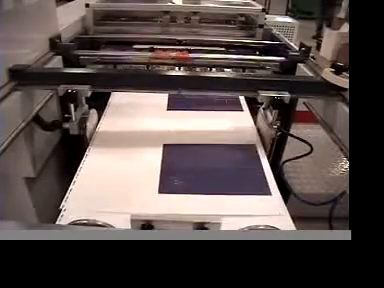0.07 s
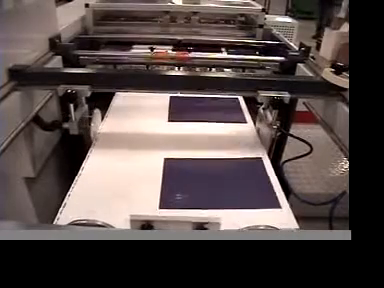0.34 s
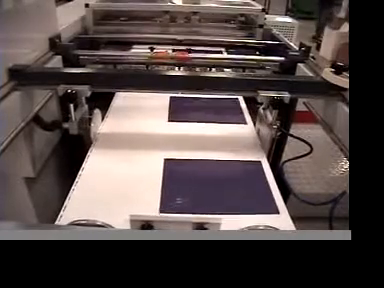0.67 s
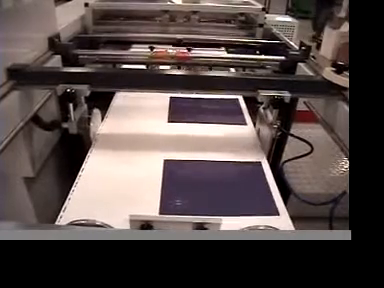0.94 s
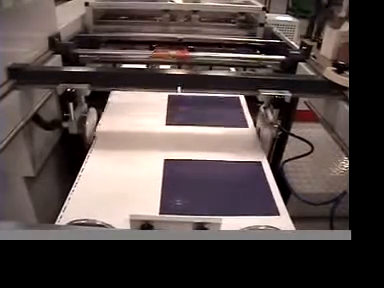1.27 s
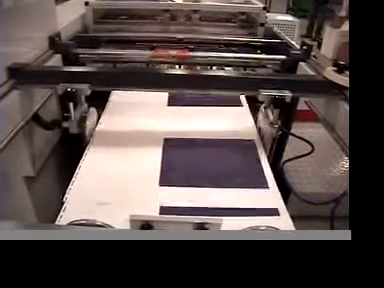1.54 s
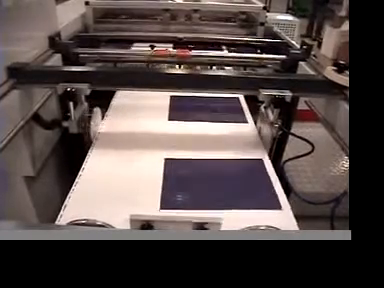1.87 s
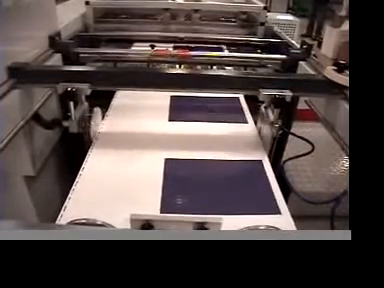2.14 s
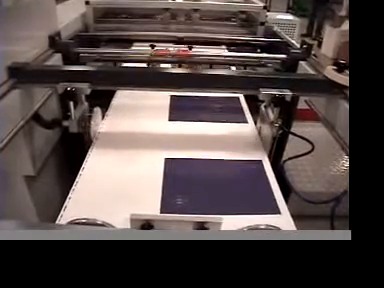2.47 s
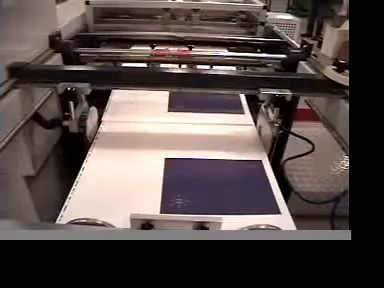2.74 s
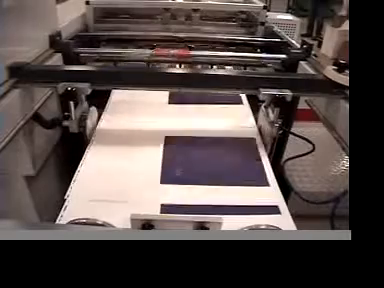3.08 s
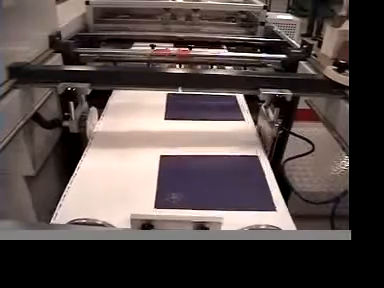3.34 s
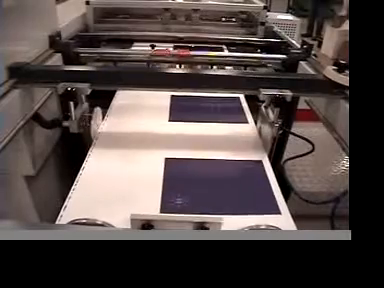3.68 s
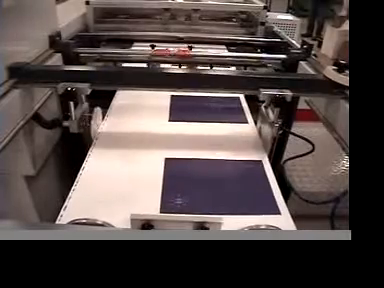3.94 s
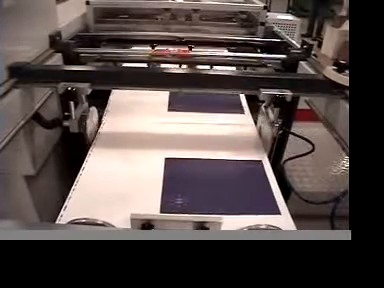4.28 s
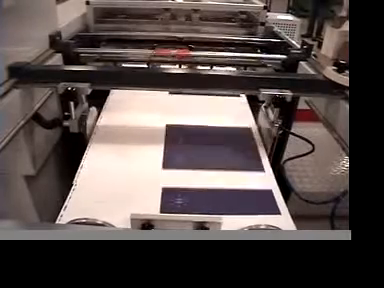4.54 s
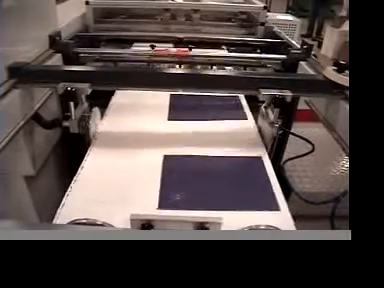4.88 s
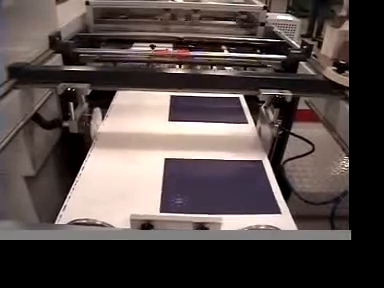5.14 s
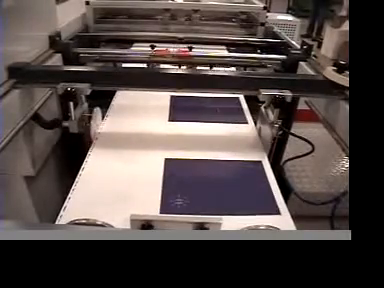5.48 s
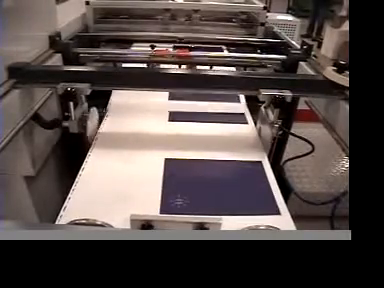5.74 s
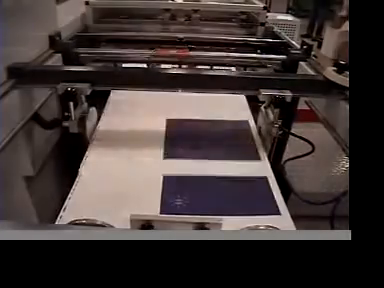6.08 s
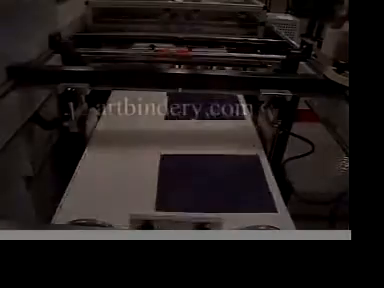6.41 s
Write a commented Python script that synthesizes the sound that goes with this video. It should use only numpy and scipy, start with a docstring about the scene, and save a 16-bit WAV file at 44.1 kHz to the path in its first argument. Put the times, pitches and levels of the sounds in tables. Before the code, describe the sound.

A steady roller rumble, fine rattle and motor hum come from a nearby workshop laminator. Over this its sheet feeder repeats a pattern four times: it knocks and ticks, lands with a clatter a little to the left, blows a bright hiss of air and clacks shut. Paper scrapes faintly near the end of each hiss. Then everything suddenly stops.

```python
"""Laminating machine in a workshop

The machine takes a sheet about every 1.54 s. Its rollers rumble and rattle while a vacuum pump hums.
A turning camshaft times the belt, a knocking stop and a ticking latch. The feeder keeps its own time:
it clatters, blows air under the next sheet and clacks shut. A fast automatic volume control turns
the sound down briefly after loud blows. Near the end everything cuts to silence."""
import sys
import numpy as np
from scipy import signal
from scipy.fft import rfft, irfft
from scipy.io import wavfile

SR = 44100
rng = np.random.default_rng(int(sys.argv[2]) if len(sys.argv) > 2 else 0)


def generate_wav(signal):
    """Clip the signal to [-1, 1] and save it as 16-bit WAV at the path in sys.argv[1]."""
    frames = np.transpose(np.atleast_2d(signal))
    scaled = np.clip(frames, -1, 1) * 32767
    pcm = np.round(scaled).astype(np.int16)
    wavfile.write(sys.argv[1], SR, pcm)


N = 287973
TIME = np.arange(N) / SR
FREQS = np.maximum(np.fft.rfftfreq(N, 1 / SR), 1)
TURN_S, END_S = 1.5395, 5.862  # one turn of the camshaft; when the sound cuts off
DIRECT_ONLY = np.array([[1], [0]])  # each source has two rows: direct sound and scattered sound

# The air-driven feeder head lands on a sheet: t/s, level/dB, time between bounces/s
HEAD_LANDINGS = [(.296, -1, 0.014), (1.866, 0, 0.012), (3.442, -1.5, .0145), (4.941, 0, .012)]
# The valve lever shuts: t/s, level/dB
LEVER_CLACKS = [(1.188, -5.5), (2.762, -5), (4.263, -6), (5.837, -4.5)]


def rollers(rumble_db, rattle_db, clicks_per_s, click_db, throb_db, flutter_db):
    """Rollers rumble unevenly; chains and bearings add a dense rattle of tiny clicks."""
    # How strong the rumble and the rattle are from low to high pitch: f/Hz, level/dB
    rumble_spectrum = [(15, -37.5), (30, -28), (42, -14), (52, -16.5), (62, -13), (80, -0.5), (170, 0.5),
                       (300, -0.5), (480, -3), (700, -2.5), (1000, -7), (1500, -14), (3000, -16),
                       (16000, -58.5)]
    rattle_spectrum = [(300, -8), (800, -0.5), (1250, 0.5), (1500, -3), (2300, -2.5), (3100, -6),
                       (4000, -11), (4800, -18.5), (6500, -17.5), (9500, -21.5), (12500, -34),
                       (16000, -41.5)]
    rumble = coloured(white(), rumble_spectrum) * from_db(rumble_db + throb_db * drift(40))
    clicks = rms_one((rng.random(N) < clicks_per_s / SR) * np.sign(white()))
    rattle = coloured(white() + from_db(click_db) * clicks, rattle_spectrum)
    return rumble + rattle * from_db(rattle_db + flutter_db * drift(60))


def transport():
    """The belt runs and jolts the frame; the next sheet is braked and rubs over the table."""
    belt = stroke(-.32, .49, rings=[(177, 50, -29.5), (2240, 500, -30)])
    jolt = stroke(-.03, .09, rings=[(90, 30, -27), (298, 123, -17.5), (540, 49, -28.5)])
    brake = stroke(.909, .125, rings=[(213, 25, -21.5), (577, 131, -22), (1256, 49, -30)])
    rub = stroke(1.055, .17, rings=[(550, 25, -23.5), (683, 60, -23), (970, 200, -24.5)])
    return belt + jolt + brake + rub


def sheet_stop():
    """The sheet stop knocks once a turn and bounces straight back."""
    # The stop's ringing tones: f/Hz, level/dB, time to fade by 60 dB/s
    tones = [(615, -15, .05), (896, -7.5, 0.12), (1280, -2, .04), (1386, -2.5, 0.052), (1970, -11, .03),
             (3000, -20, .03), (8550, -27.5, .04)]
    blows = bouncing(each_turn(.0515, db=-1), gap_s=.003, loss_db=7.5, count=2)
    return strike(blows, tones, contact_s=.00088, tail_db=-5.5, tail_s=.045, spread_db=1.5)


def feeder_head():
    """The head lifts with a light touch, then lands on the sheet and clatters."""
    # The head's ringing tones: f/Hz, level/dB, time to fade by 60 dB/s
    tones = [(966, -10.5, .06), (1036, -9, .08), (1235, -5, 0.04), (1420, -7.5, 0.046), (1694, -9.5, 0.054),
             (2003, -8.5, 0.056), (2410, -10, 0.04), (3095, -13, 0.035), (4050, -15.5, 0.036),
             (8510, -27.5, 0.043)]
    blows = each_turn(.286, db=-8.5)  # the lifts
    for lands, db, gap_s in HEAD_LANDINGS:
        blows += bouncing([(lands, db)], gap_s, loss_db=1.9, count=4)
    return strike(blows, tones, contact_s=.002, tail_db=-8, tail_s=.08, spread_db=2.5)


def valve_lever():
    """The valve lever clacks shut at the end of each blast of air."""
    # The lever's ringing tones: f/Hz, level/dB, time to fade by 60 dB/s
    tones = [(1207, -3.5, 0.046), (1453, -4, 0.037), (1580, -4.5, 0.04), (1890, -4.5, 0.055),
             (2354, -9, 0.056), (3320, -4.5, .06), (3720, -10.5, 0.087), (5500, -11.5, .04),
             (6350, -15, 0.074), (7550, -14.5, 0.045), (9000, -16, 0.05), (11100, -20, .07)]
    return strike(LEVER_CLACKS, tones, contact_s=.003, tail_db=-4, tail_s=.11, spread_db=2)


def latch():
    """The latch ticks shut with one bounce, and slides open more softly."""
    # The latch's ringing tones: f/Hz, level/dB, time to fade by 60 dB/s
    tones = [(2183, -4, 0.037), (4360, -8.5, 0.019), (5390, -8.5, 0.02), (6540, -10, 0.022),
             (7130, -6, .025), (8730, -5, 0.018), (9700, -10, 0.03), (12000, -17.5, .03)]
    shuts = bouncing(each_turn(.1965, db=-12), gap_s=.0081, loss_db=6, count=2)
    opens = each_turn(.273, db=-19)
    ticks = strike(shuts, tones, contact_s=.0005, tail_db=-1, tail_s=.044, spread_db=2)
    slides = strike(opens, tones, contact_s=.007, tail_db=0, tail_s=.09, spread_db=2.5)
    return ticks + slides


def air_blast(level_db, rise_s, fall_s, flutter_db):
    """Nozzles hiss as pressure builds when the valve opens and leaks away when it closes."""
    # The tone colour of the hiss: f/Hz, level/dB
    hiss_spectrum = [(1000, -34), (3000, 0), (4200, -1.5), (5000, -1.5), (5600, -7), (7500, -2),
                     (9100, 1.5), (10200, -3), (11500, -7), (13000, -16.5), (16000, -20.5)]
    flow = 0
    for (lands, _, _), (shuts, _) in zip(HEAD_LANDINGS, LEVER_CLACKS):
        on, off = lands + .017, shuts - .073  # just after the landing, just before the clack
        flow += np.clip((TIME - on) / rise_s, 0, 1) * np.clip(1 - (TIME - off) / fall_s, 0, 1)
    return flow * from_db(level_db + flutter_db * drift(23)) * coloured(white(), hiss_spectrum)


def paper_scrape():
    """Paper scrapes along the guides, falling in pitch as it slows."""
    # Noise bands of one scrape: delay/s, length/s, f/Hz, width/Hz, level/dB
    bands = [(.003, .012, 4900, 500, -4), (.004, .02, 3950, 500, -3), (.008, .026, 3300, 600, 0),
             (.006, .02, 2500, 500, -1), (0, .05, 8500, 2500, -12)]
    slides = each_turn(1.019, db=-21)
    scrape = 0
    for delay, length, hz, width, band_db in bands:
        loudness = sum(from_db(db + band_db) * swell(start + delay, length) for start, db in slides)
        scrape += loudness * resonant(hz, width)
    return scrape


def sucker_squeaks(waver_hz):
    """Air whistles past the lip of a suction cup."""
    # The squeaks: t/s, length/s, f/Hz, level/dB
    squeaks = [(3.482, 0.069, 6350, -19.5), (3.487, 0.039, 9300, -20), (4.953, .022, 6330, -26),
               (5.007, 0.017, 6300, -21.5)]
    whistle = 0
    for start, length, hz, db in squeaks:
        whistle += from_db(db) * swell(start, length) * sine(hz + waver_hz * drift(300))
    return whistle * DIRECT_ONLY


def pump(waver_db, wander_hz):
    """The pump and motor hum with slightly wavering tones and keep the housing droning."""
    # Tones of the pump and motor: f/Hz, level/dB
    tones = [(81, -42.5), (160, -37), (181, -43), (244, -32), (462.5, -28), (731, -35.5), (1070, -39.5),
             (1619, -37.5), (4419, -55), (5700, -49.5), (5834, -53), (5877, -54), (6122, -50.5),
             (6163, -56), (6500, -57), (6744, -50.5)]
    # Where the housing rings: f/Hz, width/Hz, level/dB
    housing_rings = [(104.7, 11, -33), (384.2, 15, -27.5), (735, 22, -35), (1932, 50, -33.5),
                     (6352, 22, -48.5)]
    hum = 0
    for hz, db in tones:
        tone = np.sqrt(2) * sine(hz + wander_hz * drift(8.6))
        hum += tone * from_db(db + waver_db * drift(8.4))
    return hum * DIRECT_ONLY + drone(housing_rings)


def strike(blows, tones, contact_s, tail_db, tail_s, spread_db):
    """Each blow builds up and makes a part ring; the frame scatters a noisy tail of the same colour."""
    out, t = np.zeros((2, N + SR)), TIME[:SR // 4]
    lowest, highest = tones[0][0], tones[-1][0]
    outline = [(hz, db - 10 * np.log10(hz / lowest)) for hz, db, _ in tones]
    noise = coloured(white(), [(lowest / 2, -30), *outline, (highest * 2, -55)])
    hz, level_db, fade_s = np.transpose(tones)[:, :, None]
    build_up = np.minimum(t / contact_s, 1)
    tail = from_db(tail_db - 60 * t / tail_s)
    for start, db in blows:
        at = int(start * SR)
        span = slice(at, at + len(t))
        strength = from_db(level_db + spread_db * rng.standard_normal(hz.shape))
        phase = 2 * np.pi * (hz * t + rng.random(hz.shape))
        ring = np.sum(strength * np.sin(phase) * from_db(-60 * t / fade_s), axis=0)
        out[:, span] += from_db(db) * build_up * (ring * DIRECT_ONLY + tail * noise[:, span])
    return out[:, :N]


def bouncing(blows, gap_s, loss_db, count):
    """Each blow becomes a run of touches, every one weaker than the last."""
    return [(start + k * gap_s, db - k * loss_db) for start, db in blows for k in range(count)]


def each_turn(offset_s, db):
    """The camshaft works a part at the same point of every turn; gives rows of t/s, level/dB."""
    return [(start + offset_s, db) for start in np.arange(0, END_S, TURN_S)]


def stroke(offset_s, length_s, rings):
    """Once a turn, a movement makes a drone swell and fade."""
    return drone(rings) * sum(swell(start, length_s) for start, _ in each_turn(offset_s, db=0))


def drone(rings):
    """A shaken part rings in bands of noise, given as f/Hz, width/Hz, level/dB."""
    return sum(from_db(db) * resonant(hz, width) for hz, width, db in rings)


def resonant(hz, width):
    """Noise ringing around one pitch, at strength 1."""
    peak = signal.iirpeak(hz, hz / width / 2.08, SR)
    return rms_one(signal.lfilter(*peak, signal.lfilter(*peak, white())))


def sine(hz):
    """A pure tone that follows a changing pitch."""
    return np.sin(2 * np.pi * np.cumsum(hz) / SR)


def white():
    """Two unrelated noises: one for the direct sound, one for the scattered sound."""
    return rng.standard_normal((2, N))


def coloured(x, spectrum):
    """Give a sound a tone colour, at strength 1."""
    return rms_one(irfft(rfft(x) * from_db(over_hz(spectrum)), N))


def drift(rate):
    """A random wander of strength 1 that changes about rate times a second."""
    points = rng.standard_normal(4096)
    return rms_one(np.interp(TIME * rate, np.arange(len(points)), points))


def swell(start, length):
    """A smooth rise and fall."""
    return np.sin(np.pi * np.clip((TIME - start) / length, 0, 1))


def over_hz(points):
    """Join rows of f/Hz, value into a curve, giving each octave equal room."""
    hz, value = np.transpose(points)
    return np.interp(np.log(FREQS), np.log(hz), value)


def from_db(db):
    """Turn decibels into a multiplier."""
    return 10 ** (np.asarray(db) / 20)


def rms_one(x):
    """Scale to an average strength (rms) of 1."""
    return x / np.sqrt(np.mean(x ** 2) + 1e-20)


def stereo(sound):
    """Direct sound reaches both sides alike, scattered sound with opposite signs; the feeder is left."""
    # How alike the two sides are: f/Hz, likeness (0 to 1)
    likeness = [(30, .65), (80, 0.96), (250, 1), (500, 0.93), (1000, 0.71), (2000, 0.74), (4000, 0.64),
                (8000, 1), (11000, 0.87), (14000, .5)]
    # How much louder the left side is: f/Hz, level/dB
    left_louder = [(60, -2.5), (110, 0), (200, -2), (380, 2.0), (700, 2), (1290, 6), (2380, 5), (4400, 0.5),
                   (8120, -0.5), (15000, 0)]
    # How far the left wave runs ahead: f/Hz, phase/rad
    left_ahead = [(100, 0.012), (430, 0.56), (1210, -0.1), (1810, 0.79), (3010, -0.84), (4130, -0.4),
                  (6370, -0.29), (11500, 0)]
    direct, scattered = rfft(sound)
    alike, sides = over_hz(likeness), np.array([[1], [-1]])
    both = np.sqrt((1 + alike) / 2) * direct + sides * np.sqrt((1 - alike) / 2) * scattered
    balance = from_db(sides * over_hz(left_louder) / 2)
    phase_shift = np.exp(.5j * sides * over_hz(left_ahead))
    return irfft(both * balance * phase_shift, N)


def volume_control(x, threshold_db, deepest_db, recover_db_per_s, attack_s):
    """Peaks over the threshold quickly pull the volume down; it then climbs back steadily."""
    peak_db = 20 * np.log10(np.abs(x).max(axis=0) + 1e-9)
    over_db = np.clip(peak_db - threshold_db, 0, deepest_db)
    recovery_db = recover_db_per_s * TIME
    dip_db = np.maximum.accumulate(over_db + recovery_db) - recovery_db
    smoothing = np.exp(-1 / (attack_s * SR))
    return x * from_db(-signal.lfilter([1 - smoothing], [1, -smoothing], dip_db))


def scene():
    """The running drive, the knocking parts, the paper feed and the pump, in stereo."""
    drive = rollers(rumble_db=-19, rattle_db=-20, clicks_per_s=600, click_db=-6.5,
                    throb_db=.75, flutter_db=1) + transport()
    knocks = sheet_stop() + feeder_head() + valve_lever() + latch()
    hiss = air_blast(level_db=-27.5, rise_s=.093, fall_s=.061, flutter_db=.3)
    paper = paper_scrape() + sucker_squeaks(waver_hz=59.1)
    return stereo(drive + knocks + hiss + paper + pump(waver_db=.74, wander_hz=1.1))


def record(dry):
    """Turn loud moments down, clip the peaks, cut to silence and remove the highest treble."""
    held = volume_control(dry, threshold_db=-2.5, deepest_db=5.5, recover_db_per_s=110, attack_s=.0008)
    fade = np.clip((END_S - TIME) / .0086 + 1, 0, 1)
    treble_cut = signal.ellip(12, .1, 80, 15900, fs=SR, output="sos")  # above 15900 Hz
    return signal.sosfilt(treble_cut, np.clip(held, -.97, .97) * fade)


dry = scene()
out = record(dry)
generate_wav(out)
```